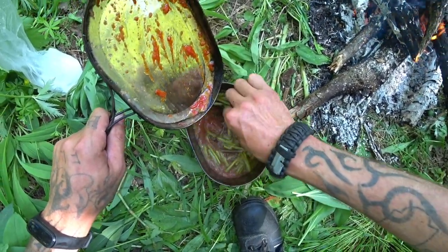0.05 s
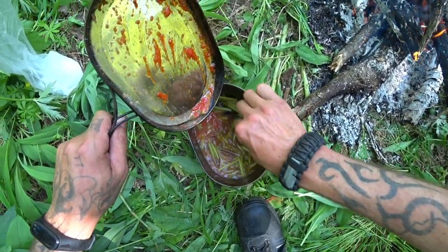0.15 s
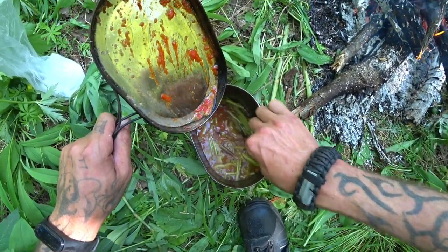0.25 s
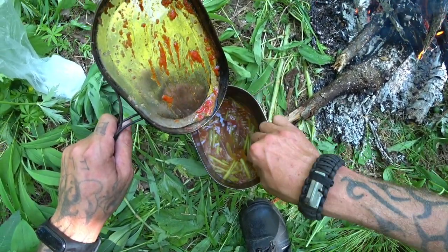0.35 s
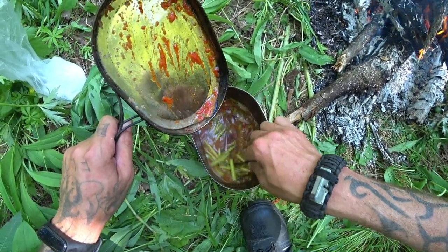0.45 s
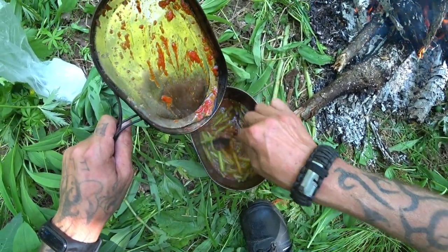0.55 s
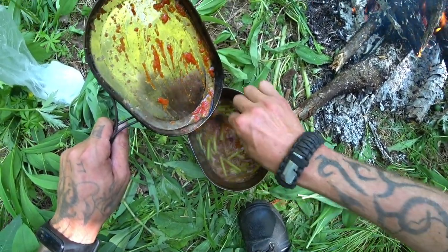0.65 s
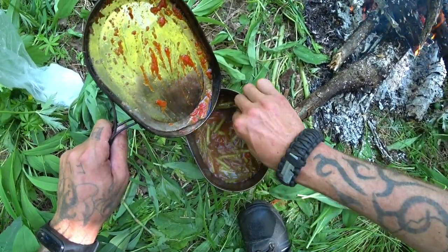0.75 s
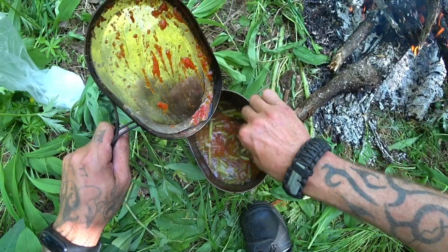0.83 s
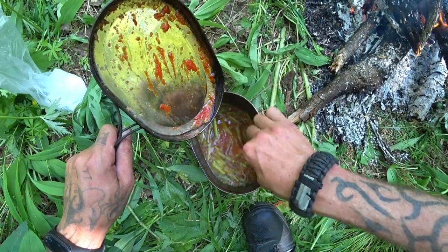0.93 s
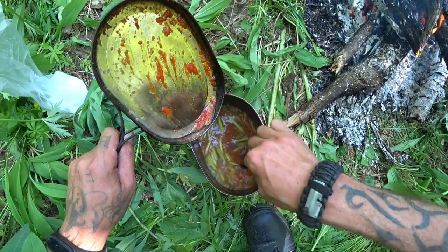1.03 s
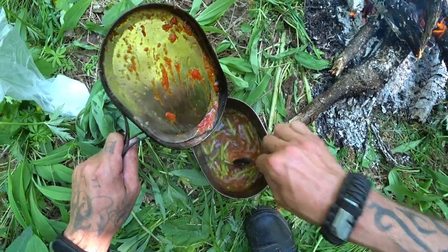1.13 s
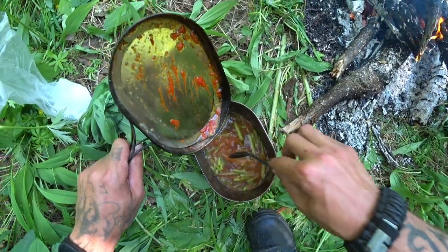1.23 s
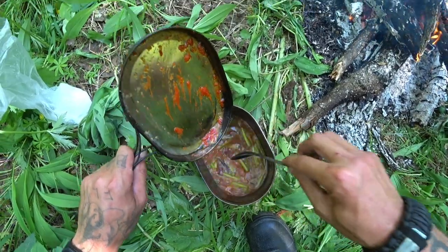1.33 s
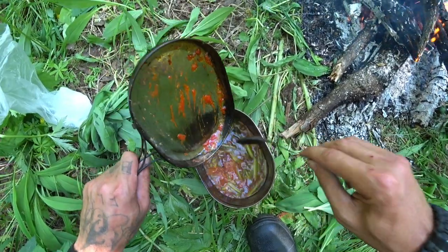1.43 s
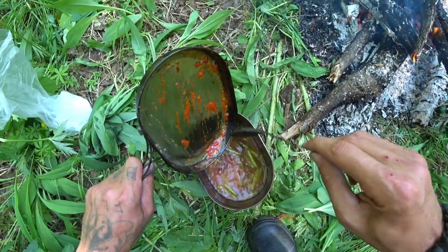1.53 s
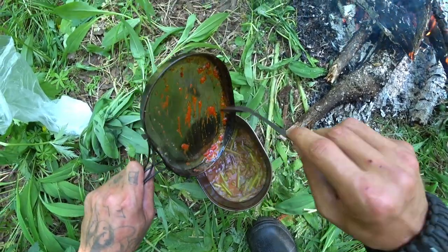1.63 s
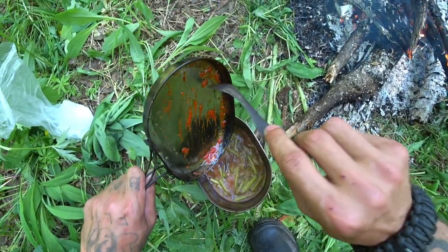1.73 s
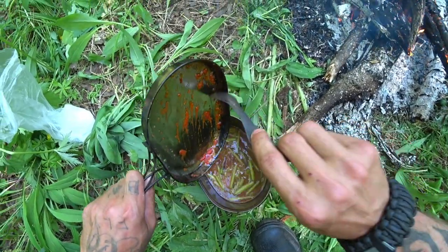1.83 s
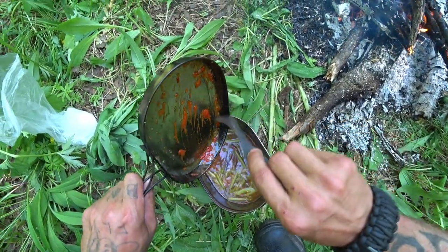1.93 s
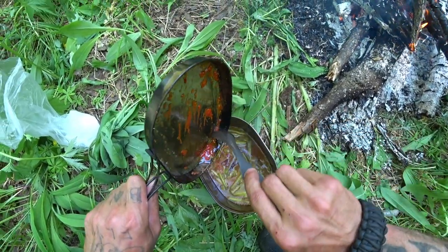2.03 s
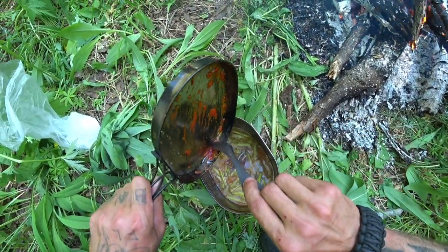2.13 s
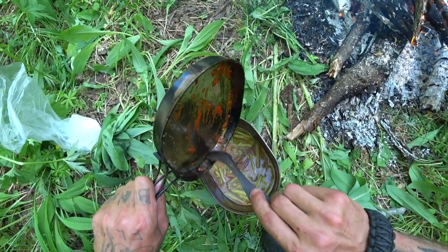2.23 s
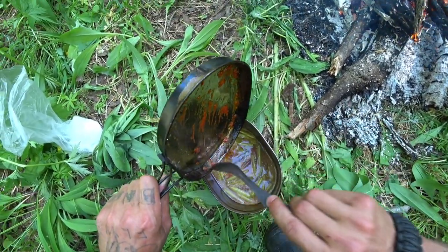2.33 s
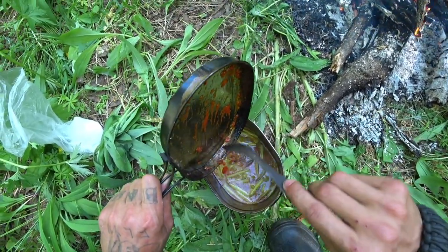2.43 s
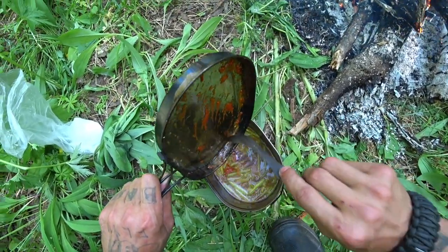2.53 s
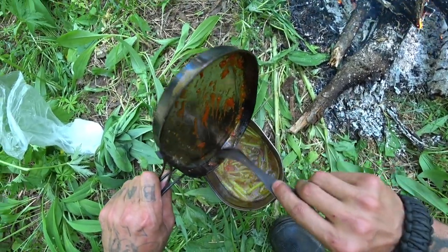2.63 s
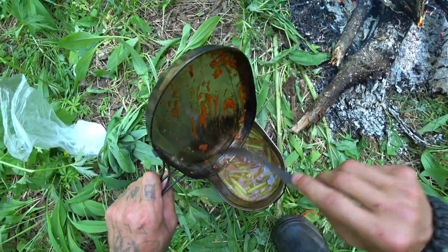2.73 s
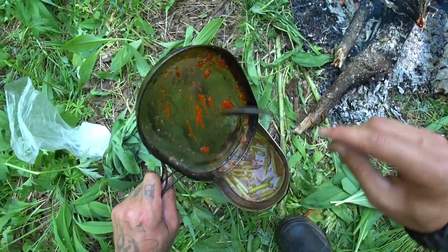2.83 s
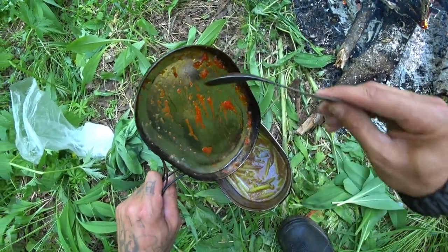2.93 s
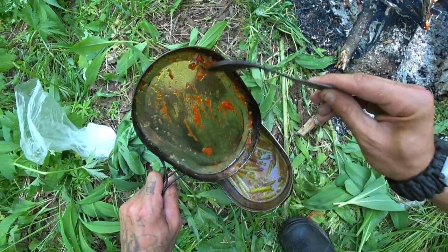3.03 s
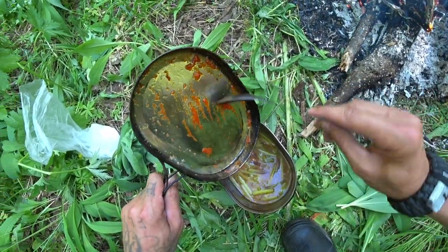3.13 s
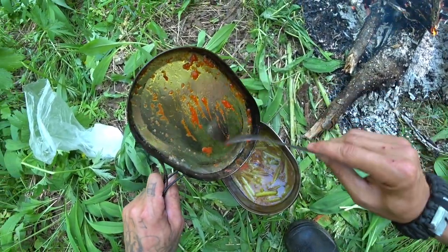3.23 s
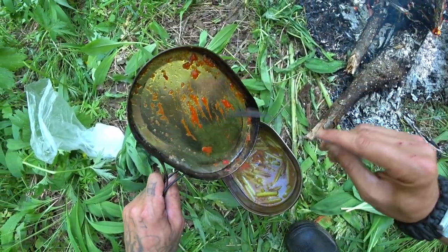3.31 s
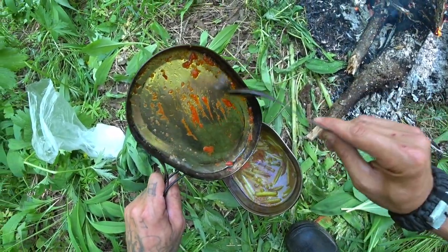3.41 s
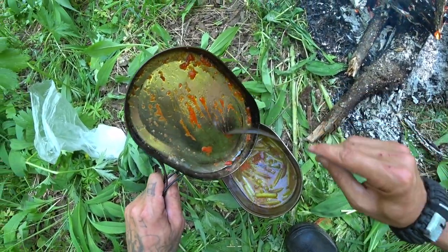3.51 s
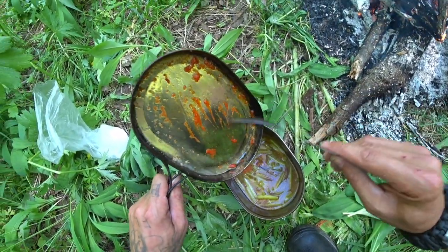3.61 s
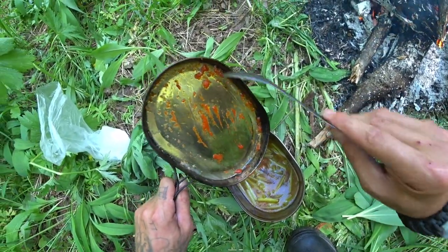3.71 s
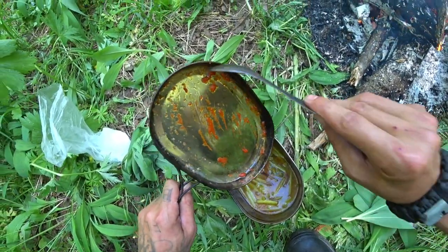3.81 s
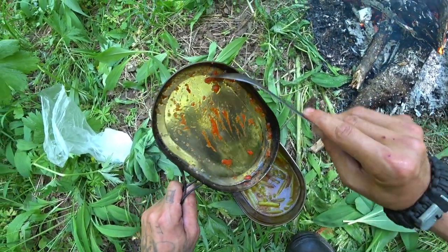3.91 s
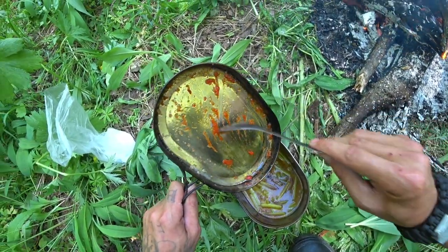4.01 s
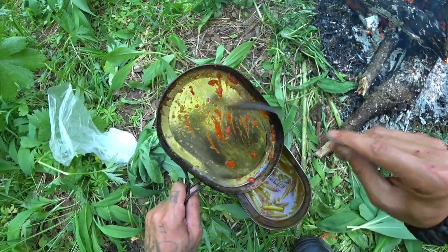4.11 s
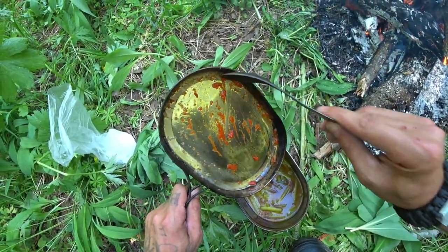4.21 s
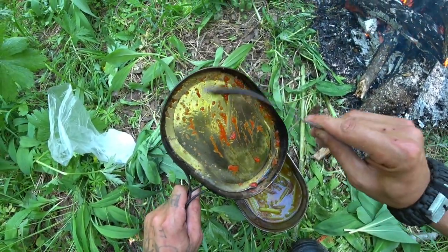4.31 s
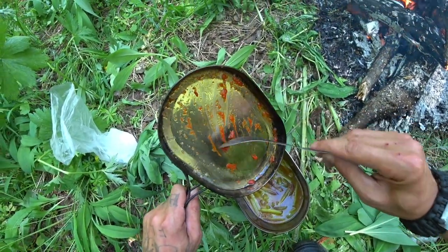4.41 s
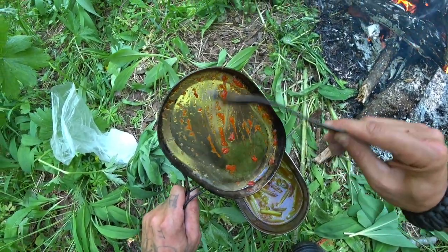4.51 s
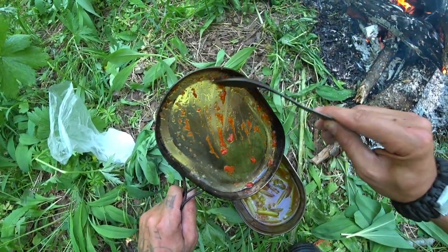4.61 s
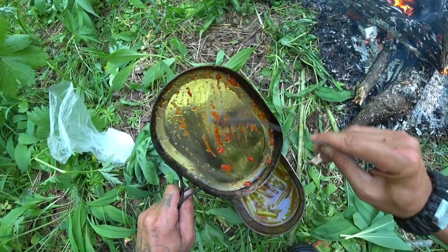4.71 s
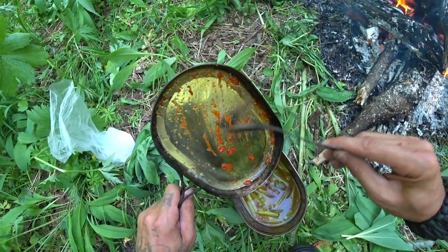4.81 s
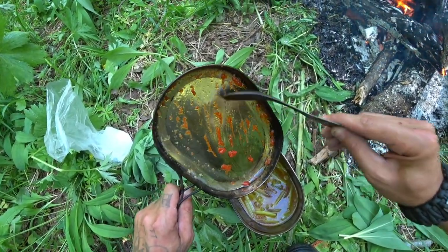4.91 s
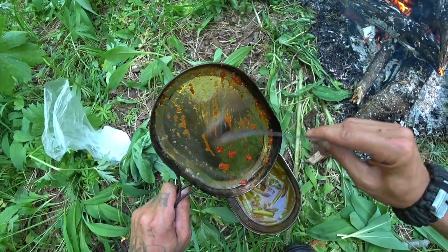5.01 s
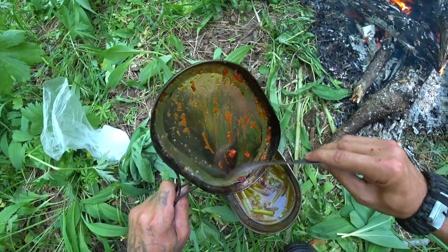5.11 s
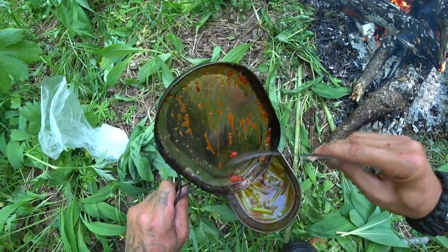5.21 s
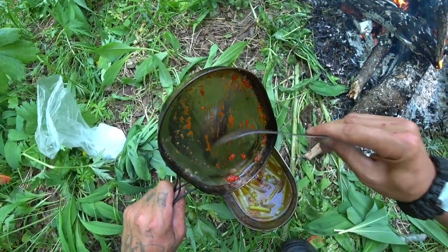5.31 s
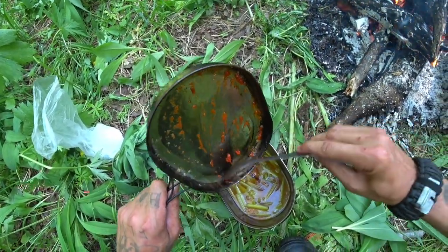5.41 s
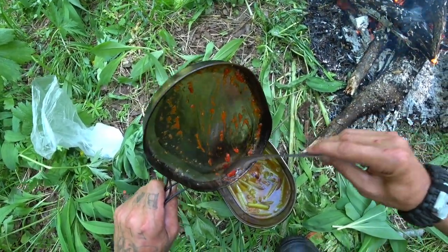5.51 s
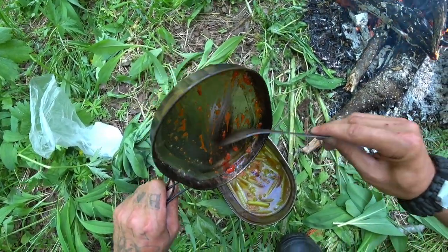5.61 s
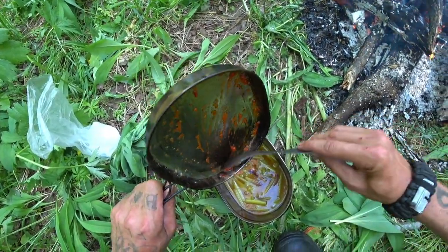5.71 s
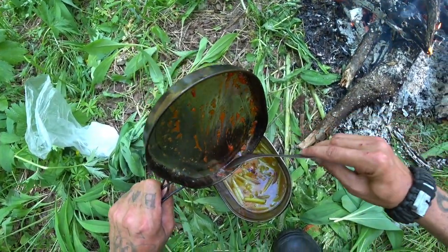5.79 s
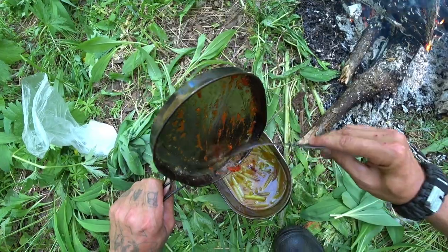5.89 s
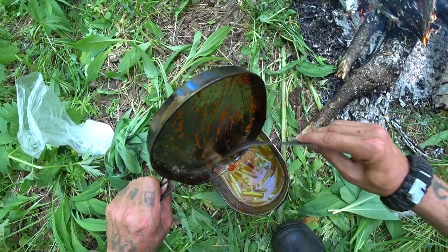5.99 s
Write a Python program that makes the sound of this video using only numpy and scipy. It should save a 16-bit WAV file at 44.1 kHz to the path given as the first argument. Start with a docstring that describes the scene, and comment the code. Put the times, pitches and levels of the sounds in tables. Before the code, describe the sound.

Close, dry outdoor sound over a very faint low rumble. From 0 s stew sizzles wetly in a metal tin, in fizzing flares near 0, 0.5, 0.8 and 1.2 s, with small hollow plops rising in pitch. A campfire snaps alongside, with an especially hard crack at about 0.5 s. By 1.4 s the sizzle sinks to a whisper, and a soft low thud falls at 1.5. At 1.85 a steel spoon clanks on a thin pan, followed by quick scratchy scrapes until 2.4. A bright ringing knock comes at 2.65, then clank-and-scrape groups around 3.1, 3.5, 3.9, 4.3 and 4.7, with a duller low knock at 4.8. Strikes crowd closer near 5.0, 5.4 and 5.7, with brief gritty drags between, and a last clank at about 6.04 is cut short. Light fire ticks persist throughout.

```python
"""Hot stew sizzles and plops in a mess tin beside a snapping campfire: noise grains and rising tones.
Then a steel spoon works a thin hand-held pan: each strike is a crack, a crowded clank and ringing modes.
Between strikes the spoon scrapes sauce off the wall: catching, slipping noise that also rings the pan.
The two microphone ports are close by, over a faint outdoor rumble of shaped noise."""
import sys
import numpy as np
from scipy import signal
from scipy.fft import rfft, irfft, next_fast_len
from scipy.io import wavfile
from scipy.ndimage import map_coordinates

SR = 44100
rng = np.random.default_rng(int(sys.argv[2]) if len(sys.argv) > 2 else 0)


def bounce(signal):
    """Save signal as a 16-bit WAV file at the path given by the first command-line argument."""
    frames = np.transpose(np.atleast_2d(signal))
    limited = np.clip(frames, -1, 1)
    pcm = np.round(limited * 32767).astype(np.int16)
    wavfile.write(sys.argv[1], SR, pcm)


N = 266907
TIME = np.arange(N) / SR
CUTOFF_HZ = 15700
OPPOSED = np.array([[1], [-1]])  # left and right in opposite polarity

# The main modes of the pan's wall, and last a faint high tone at 13680 Hz. Each row: pitch in Hz, relative
# level in dB, free t60 in seconds.
PAN_MODES = [(191, -20, .25), (362, -7, .7), (686, -4, .48), (1225, 1, .24), (1437, -3, .27),
             (1686, -2, .4), (2054, -8, .22), (2254, -6, .3), (2463, -4, .15), (2599, -4, .22),
             (2749, -6, .17), (2898, -11, .3), (3064, -3, .33), (3322, -7, .2), (3597, -12, .34),
             (3767, -8, .2), (3808, -8, .46), (4032, -6, .21), (4189, -7, .2), (4386, -10, .22),
             (4823, -9, .18), (4938, -9, .21), (5333, -9, .26), (5386, -5, .22), (5695, -9, .24),
             (5995, -4, .21), (6691, -8, .2), (6968, -6, .15), (7141, -7, .23), (13680, -22, .18)]


def from_db(db):
    """Decibels to gain."""
    return 10 ** (np.asarray(db) / 20)


def rms_one(x):
    """Scale to unit power."""
    return x / np.sqrt(np.mean(x ** 2) + 1e-20)


def at_hz(points, hz):
    """Read a table on a log-frequency axis."""
    freqs, values = np.transpose(points)
    return np.interp(np.log(np.maximum(hz, 1)), np.log(freqs), values)


def decay(t, t60):
    """Falls 60 dB in t60."""
    return np.exp(-np.log(1000) * t / t60)


def add(out, s, sound):
    """Mix a sound in from time s."""
    start = max(int(s * SR), 0)
    out[:, start:start + sound.shape[-1]] += sound[..., :max(N - start, 0)]


def tilted(hz, tilt_db):
    """Gain of a slope in dB per octave, hinged in the presence range."""
    return from_db(tilt_db * np.log2(np.clip(hz, 500, 16000) / 3500))


def colour(x, spectrum, tilt_db=0):
    """Shape a sound with a spectrum and a tilt; unit power."""
    length = x.shape[-1]
    size = next_fast_len(length)
    hz = np.arange(size // 2 + 1) * SR / size
    gain = from_db(at_hz(spectrum, hz)) * tilted(hz, tilt_db)
    return rms_one(irfft(rfft(x, size) * gain, size)[..., :length])


def noise(size, width):
    """Stereo noise: a common part and a weaker opposed part."""
    mid, side = rng.standard_normal((2, size))
    return mid + width * side * OPPOSED


def flutter(size, rate):
    """A random wobble with about rate turns a second, drawn with spread 1."""
    return np.interp(np.arange(size) * rate / SR, np.arange(size // 4), rng.standard_normal(size // 4))


def ports(x):
    """The two microphone ports hear the close sources with slightly different level and phase."""
    # Each row: frequency in Hz, level of left over right in dB.
    balance = [(60, 0.0), (110, 3), (200, -0.055), (380, -1), (700, -1.1), (1290, -1.77), (2380, -2.5),
               (4400, -2.0), (8120, -2), (15000, -0.2)]
    # Each row: frequency in Hz, phase by which left leads in radians.
    lead = [(0, 0), (520, -0.47), (1120, -0.99), (4310, -0.36), (16300, -0.25)]
    size = next_fast_len(N + SR // 8)
    hz = np.arange(size // 2 + 1) * SR / size
    # each port takes half the difference
    half = from_db(at_hz(balance, hz) / 2) * np.exp(.5j * at_hz(lead, hz))
    return irfft(rfft(x, size) * np.array([half, 1 / half]), size)[:, :N]


def open_air(level_db=-54, opposed_db=-3.0):
    """Outdoor rumble: shaped noise common to both ports, plus noise opposed between them."""
    # The air's spectrum. Each row: frequency in Hz, relative level in dB per Hz.
    rumble = [(20, -2.5), (45, 2), (100, 1), (180, -1.5), (300, -8.5), (600, -16.5), (1500, -20.5),
              (4000, -43.5), (10000, -52), (16000, -33)]
    common = colour(rng.standard_normal(N), rumble)
    # the longest waves reach both ports mostly alike, so this part is weak down there
    opposed = colour(rng.standard_normal(N), [(20, -7), (70, -16), (150, -6.5), (400, -4.5),
                                              (1500, -9.5), (5000, -22), (16000, -31.5)])
    return from_db(level_db) * (common + from_db(opposed_db) * opposed * OPPOSED)


def faint_snaps(per_s=2, level_db=-39.5, spread_db=5.5, centre_hz=4570):
    """Small splits at chance moments, of chance size and pitch, as rows like the loud ones."""
    chances = rng.random((int(per_s * N / SR), 3))
    rows = []
    for when, size, pitch in chances:
        snap_db = level_db + spread_db * (2 * size - 1)
        rows.append((when * N / SR, snap_db, centre_hz * 2 ** (pitch - .5), 0))
    return rows


def snaps(crack_db=-6.0, wood_db=-16.5, wood_octaves=0.58, t60_s=0.017):
    """Burning wood splits: a broad crack with a very short woody ring."""
    # The fire's loud snaps. Each row: start in seconds, relative level in dB, centre in Hz,
    # trim of the flat crack against the woody ring in dB.
    loud_snaps = [(.0488, -10, 4660, -28), (.108, -17, 5000, 1), (0.377, -23, 4400, -3.5),
                  (.467, -19.5, 2980, -5), (0.48, 4, 3420, -35), (0.994, -18.5, 4930, -1),
                  (1.105, -17.5, 1620, -11), (1.216, -14.5, 2870, -6.5), (1.456, -30.5, 3600, 2.5),
                  (1.481, -27, 2560, 2), (2.4314, -13.5, 3930, 4.5), (3.016, -27, 4370, -9.5),
                  (3.065, -30, 4240, 4), (3.7495, -19.5, 1980, -4), (3.834, -18, 1970, -6),
                  (4.379, -10, 5000, -8.5), (4.553, -19, 2340, 1.5), (4.964, -14.5, 1710, -6),
                  (5.32, -24.5, 2530, -6), (5.3359, -26.5, 2520, -1), (5.919, -19.5, 3830, -1.5)]
    out, t = np.zeros((2, N)), np.arange(SR // 16) / SR
    for s, level_db, hz, flat_db in [*loud_snaps, *faint_snaps()]:
        crack = colour(noise(len(t), width=0.48),
                       [(150, -5), (700, 3.5), (2000, 0), (9000, 2), (16000, -8.5)])
        spread = 2 ** wood_octaves
        wood = colour(noise(len(t), width=0.16),
                      [(hz / 4, -35), (hz / spread, -10), (hz, 0), (hz * spread, -10), (hz * 4, -35)])
        split = from_db(crack_db + flat_db) * crack + from_db(wood_db) * wood
        add(out, s, from_db(level_db) * decay(t, t60_s) * split)
    return out


def sizzle(fizz_db=-4.0, hiss_db=-3.0, grain_db=5.0, clump_db=3.5, attack_s=0.0083, simmer_hiss_db=-2):
    """Countless tiny steam bursts, coming in clumps; each stir flares them up, and they die to a simmer."""
    # The simmer between stirs. Each row: time in seconds, level in dB ahead of the fizz and hiss trims.
    simmer = [(0, -42), (.4, -48), (.66, -47), (1.12, -44), (1.35, -55), (2.6, -56), (4.3, -63.5),
              (6.05, -62)]
    # The spoon turns stew onto hot metal. Each row: start in seconds, length in seconds, wet fizz in dB
    # ahead of its trim, fine hiss against it in dB ahead of the trims, t60 of the dying sizzle in seconds.
    stirs = [(.002, 0.12, -36.5, 2.5, 0.6), (0.519, 0.06, -34, -5.5, 0.18), (0.772, 0.068, -38, 2, 0.43),
             (1.184, 0.025, -41.5, 1.5, 0.12)]
    # Spectrum of the wet fizz. Each row: frequency in Hz, relative level in dB per Hz.
    fizz = [(400, -16.5), (700, 3), (1100, -9.5), (1700, -1.5), (2300, -3), (3000, 3.5), (3600, -0.5),
            (5500, 0.5), (7500, -8.5), (12000, -65)]
    # Spectrum of the fine hiss. Each row: frequency in Hz, relative level in dB per Hz.
    hiss = [(3000, -25), (5500, -12), (7000, -4), (10500, -4.5), (13000, -10), (16000, -15)]
    wet = from_db(np.interp(TIME, *np.transpose(simmer)))
    fine = wet * from_db(simmer_hiss_db)
    for s, length, level_db, fine_db, t60 in stirs:
        attack = np.clip((TIME - s) / attack_s, 0, 1)
        flare = from_db(level_db) * attack * decay(np.maximum(TIME - s - length, 0), t60)
        wet = np.hypot(wet, flare)
        fine = np.hypot(fine, flare * from_db(fine_db))
    clumps, out = clump_db * flutter(N, 250), 0
    for spectrum, level in (fizz, wet * from_db(fizz_db)), (hiss, fine * from_db(hiss_db)):
        bursts = noise(N, width=0.049) * from_db(clumps + grain_db * flutter(N, 4000))
        out = out + colour(bursts, spectrum) * level
    return out


def plops_and_knock(swell_s=0.00042, splash_db=-4.5, rise_hz_per_s=4700):
    """Each plop, thud or knock is a short ring that rises in pitch, with a small splash of noise."""
    # Plops and thuds of the stew, and a low knock of the spoon on the pan at 4.82 s. Each row: start in
    # seconds, level of the tone in dB ahead of its swell and decay, starting pitch in Hz, t60 in seconds.
    plop_rows = [(.033, -29.5, 750, 0.023), (.357, -30, 770, 0.024), (0.359, -33, 1610, 0.013),
                 (.534, -33.5, 656, 0.022), (.643, -31.5, 657, 0.018), (.856, -32.5, 735, 0.018),
                 (0.976, -26.5, 544, 0.028), (1.089, -31, 1570, 0.034), (1.106, -31, 770, 0.026),
                 (1.358, -51.5, 2160, 0.19), (1.366, -35, 557, 0.055), (1.383, -35.5, 755, 0.045),
                 (1.393, -36, 2430, .036), (1.485, -23.5, 103, 0.027), (1.671, -34.5, 414, 0.024),
                 (4.8226, -26.5, 596, 0.023), (5.108, -35.5, 623, .06)]
    out, t = np.zeros((2, N)), np.arange(SR // 8) / SR
    for s, level_db, hz, t60 in plop_rows:
        tone = np.sin(2 * np.pi * np.cumsum(hz + rise_hz_per_s * t) / SR)
        splash = colour(noise(len(t), width=0.24), [(hz / 4, -14), (hz, 0), (hz * 2, -10), (hz * 8, -40)])
        envelope = decay(t, t60) * (1 - np.exp(-t / swell_s))
        add(out, s, from_db(level_db) * (tone + from_db(splash_db) * splash) * envelope)
    return out


def resonant(x, peak_hz, peak_db, ripple_db, spacing_hz, peak_octaves=0.06):
    """The touching spoon loads the wall: an uneven comb of resonances, new at each spot, one favoured."""
    length = x.shape[-1]
    size = next_fast_len(length)
    hz = np.arange(1, size // 2 + 2) * SR / size
    comb = np.interp(hz / spacing_hz, np.arange(1000), rng.standard_normal(1000).clip(-2, 2))
    peak = np.exp(-.5 * (np.log2(hz / peak_hz) / peak_octaves) ** 2)
    gain = from_db(ripple_db * comb + peak_db * peak)
    return rms_one(irfft(rfft(x, size) * gain, size)[..., :length])


def drag_pressure(lengths, fade_over_swell=1.064):
    """A smooth swell and fade; time is counted in half-lengths from the hardest moment."""
    return np.exp(-.5 * (lengths / np.where(lengths < 0, 1, fade_over_swell)) ** 2)


def wall_ring(force, ring_db):
    """Friction drives the wall's main modes, each a damped two-pole resonator, alternating in sign."""
    ring = 0
    for k, (hz, mode_db, t60) in enumerate(PAN_MODES):
        r, w = decay(1 / SR, t60), 2 * np.pi * hz / SR
        mode = signal.lfilter([0, np.sin(w)], [1, -2 * r * np.cos(w), r * r], force)
        ring = ring + (-1) ** k * from_db(mode_db + ring_db) * mode
    return ring


def scrapes(catch_db=1.5, catch_rate=320, grit_db=2.0, ring_db=-47.0, loaded_hz=2600, contact_db=10.5,
            ripple_db=9.5):
    """The spoon's edge catches and slips on the crusted wall; the friction also rings the wall's modes."""
    # The spoon drags over the wall. Each row: hardest pressure in seconds, half-length in seconds,
    # level at that moment in dB, treble tilt in dB per octave, contact resonance in Hz,
    # glide of the low resonances in octaves per second.
    drags = [(1.95, 0.0091, -23.5, 4, 6350, -0.5), (1.99, 0.034, -23, 1.5, 3210, -1.5),
             (2.089, 0.026, -28.5, -2, 4800, 1), (2.203, .021, -25.5, -2.5, 4800, -0.5),
             (2.304, 0.018, -28, -2.5, 2330, 1), (2.4, 0.01, -23.5, 0.5, 6380, -1),
             (2.695, 0.019, -25.5, -2, 7260, 1), (3.145, 0.02, -25.5, -2.5, 1200, 1.5),
             (3.241, 0.027, -36, -4.5, 1240, 0), (3.282, 0.012, -27.5, 4.5, 4940, 2),
             (3.582, 0.02, -28.5, .5, 4060, -2.5), (3.901, .02, -28, -2.5, 3300, 0.5),
             (4.008, 0.026, -38.5, -3.5, 1920, -4), (4.069, 0.018, -24.5, -0.5, 7100, 1),
             (4.447, .026, -26.5, 0.5, 1600, -4), (4.754, 0.017, -35.5, -1.5, 1490, 1),
             (4.793, 0.018, -27.5, -0.5, 1820, -3), (5.067, 0.023, -29.5, -1.5, 1640, 2.5),
             (5.136, 0.013, -27.5, -2, 1700, 0), (5.198, 0.023, -33.5, 2, 1540, -1.5),
             (5.443, 0.02, -29, -1, 1290, 8), (5.506, 0.018, -27, 4, 6350, 1),
             (5.74, 0.012, -29.5, -4.5, 1400, -3.5), (5.821, 0.015, -26.5, 2.5, 2030, -4),
             (5.875, 0.016, -35, -2, 1640, -1)]
    # Spectrum of the wall under friction. Each row: frequency in Hz, relative level in dB per Hz.
    rasp_spectrum = [(150, -31), (450, -27.5), (800, -6), (1400, -1.5), (2800, 0), (5000, 0.5), (7000, 0.5),
                     (8500, -2), (10500, -1.5), (12500, -10.5), (16000, -18)]
    rasp, shaking = np.zeros((2, N)), np.zeros((1, N))
    t = np.arange(SR // 3) / SR - 1 / 6  # zero at the hardest pressure
    split = signal.butter(4, loaded_hz, fs=SR, output="sos")
    for s, half_length, level_db, tilt_db, contact_hz, glide in drags:
        pressure = from_db(level_db) * drag_pressure(t / half_length)
        wall = colour(noise(SR // 2, width=0.027), rasp_spectrum, tilt_db)
        wall = resonant(wall, contact_hz, contact_db, ripple_db, spacing_hz=70.53)
        # the low resonances slide as the point of contact travels; the high ones stay put
        low = signal.sosfiltfilt(split, wall)
        place = np.cumsum(2 ** (glide * t))
        sliding = np.array([map_coordinates(side, [place], order=3, mode="mirror") for side in low])
        friction = sliding + (wall - low)[:, :len(t)]
        slips = from_db(catch_db * flutter(len(t), catch_rate) + grit_db * flutter(len(t), 3000))
        add(rasp, s + t[0], pressure * rms_one(friction * slips))
        add(shaking, s + t[0], pressure * colour(slips * rng.standard_normal(len(t)), rasp_spectrum))
    return rasp + wall_ring(shaking[0] + 1e-18, ring_db)


def crowded_modes(size, spacing_hz, width):
    """Undamped modes at uneven steps, each with a chance strength, phase and place between the ports."""
    hz = spacing_hz * (np.arange(1, 1200) + rng.uniform(-.5, .5, 1199))
    mid, side = rng.standard_normal((2, len(hz))) + 1j * rng.standard_normal((2, len(hz)))
    heard = hz < CUTOFF_HZ
    lines = np.zeros((2, size // 2 + 1), complex)
    lines[:, (hz[heard] * size / SR).astype(int)] = (mid + width * side * OPPOSED)[:, heard]
    return irfft(lines, size)


def strikes(spot_octaves=0.18, scatter_db=4.5, build_s=0.0054, crack_db=-4.0, crack_t60=0.018,
            ripple_db=4.0, spot_share=0.57, drum_hz=600, drum_level_db=-5.5,
            rim_hz=1850, rim_loss_db_per_octave=3, clank_t60_s=0.13, clank_doubles_every_db=21.0):
    """A blow or lift-off is a crack, a clank of crowded modes and the ring of the wall's main modes."""
    # The spoon lands on the pan, or lifts off and lets it ring (2.43 s). Each row: start in seconds,
    # clank level in dB, ring against the clank in dB, treble tilt in dB per octave,
    # pitch that the touched spot favours in Hz, its lift in dB,
    # share of the free ring time left by the spoon's touch from 0 to 1 (at least a tenth is kept).
    contacts = [(1.8472, -14, -11.5, -0.5, 2470, 16, 0.95), (1.866, -22, 4, -3.5, 1210, 5.5, 0.48),
                (2.4306, -40, 3.5, 5, 3800, 35, 0.86), (2.6496, -16.5, 2.5, -1.5, 2470, 12, 0.99),
                (2.655, -19.5, -10, 21, 3090, 35, 1), (2.659, -27.5, 4, -3, 3800, 8, 1),
                (3.0992, -16, -4, 1, 700, 18, 0.62), (3.1605, -15.5, -5.5, -1.5, 2220, 14, 0.39),
                (3.5102, -15, 0, -2, 1690, 7, 0.44), (3.8584, -15.5, -2, 1, 1034, 24, .55),
                (3.9238, -15, -8, 0.5, 1760, 10.5, 0.96), (4.073, -23, -3.5, 4.5, 6860, 22, 0.9),
                (4.329, -14.5, -3.5, 0, 1110, 17.5, 0.81), (4.6755, -17.5, -16, -1.5, 1240, 0, 0.2),
                (4.6964, -13.5, -0.5, -0.5, 1340, 20, 0.8), (4.822, -24, -3.5, -0.5, 4460, 9, 0.95),
                (5.0068, -15.5, 3, -1.5, 1690, -2, 0.4), (5.021, -15, -2, -1.5, 1630, 14, 0.38),
                (5.0899, -16.5, -13.5, 12.5, 2380, 20, 0.5), (5.3892, -19.5, 3.5, 4.5, 1430, 6.5, 0.78),
                (5.392, -21, -20.5, -10.5, 870, 22, 1), (5.4804, -19.5, -13, 3, 4050, 14, 0.4),
                (5.520, -23, -6, -1.5, 3600, 5.5, 0.98), (5.6954, -15.5, -5.5, -1.5, 830, 21, 0.02),
                (5.7340, -18.5, -10.5, 5.5, 2500, 12, 1), (6.0357, -17.5, -5.5, -4, 810, 11, 0.6)]
    # Spectrum of the short-lived modes. Each row: frequency in Hz, relative level in dB per Hz.
    clank_spectrum = [(100, -49), (190, -22.5), (280, -20.5), (520, -15), (850, -5.5), (1050, -5),
                      (1300, 0.5), (2400, -0.5), (5000, 2), (7200, 0), (8300, -4.5), (10000, -2.5),
                      (12500, -12.5), (16000, -26)]
    out, t = np.zeros((2, N)), np.arange(SR * 3 // 5) / SR
    short = t[:SR // 4]
    hz, mode_db, t60 = np.transpose(PAN_MODES)
    # a landing spoon rebounds for a few milliseconds, pumping the modes up
    waves = np.exp(2j * np.pi * hz[:, None] * t) * (1 - np.exp(-t / build_s))
    drum = 1 / (1 + (hz / drum_hz) ** 4)  # picks out the deep drum modes
    for s, clank_db, ring_db, tilt_db, spot_hz, lift_db, free in contacts:
        # deep modes follow the force of the blow, however little the rest rings;
        # spots near the rim favour high pitches and move the deep modes less
        rim_octaves = max(np.log2(spot_hz / rim_hz), 0)
        drum_db = drum_level_db - ring_db - rim_loss_db_per_octave * rim_octaves
        favoured = np.exp(-.5 * (np.log2(hz / spot_hz) / spot_octaves) ** 2)
        scatter = scatter_db * rng.standard_normal(len(hz))
        share = from_db(mode_db + lift_db * favoured + drum_db * drum + scatter) * tilted(hz, tilt_db)
        share = share / np.linalg.norm(share) * np.exp(2j * np.pi * rng.random(len(hz)))
        # a spoon that stays on the wall damps it; one that lifts lets it ring
        damping = decay(t, t60[:, None] * np.clip(free, .1, 1))
        ring = (share @ (waves * damping)).real
        add(out, s, np.sqrt(2) * from_db(clank_db + ring_db) * ring)
        crowd = crowded_modes(len(short), spacing_hz=54.4, width=0.068)
        crowd = colour(crowd, clank_spectrum, tilt_db)
        crowd = resonant(crowd, spot_hz, spot_share * lift_db, ripple_db, spacing_hz=154.9)
        # a contact that rings more also clanks longer
        clank = crowd * decay(short, clank_t60_s * 2 ** (ring_db / clank_doubles_every_db))
        crack = colour(noise(len(short), width=0.061), clank_spectrum, tilt_db) * decay(short, crack_t60)
        add(out, s, from_db(clank_db) * (clank + from_db(crack_db) * crack))
    return out


def scene():
    """Fire, stew and pan close to the microphone ports, over the open air."""
    close = snaps() + sizzle() + plops_and_knock() + scrapes() + strikes()
    return open_air() + ports(close)


def record(dry, top=1.0):
    """The sharpest peaks are rounded and the top of the treble is cut."""
    rounded = top * np.tanh(dry / top)
    return signal.sosfilt(signal.ellip(10, .1, 80, CUTOFF_HZ, fs=SR, output="sos"), rounded)


dry = scene()
out = record(dry)
bounce(out)
```